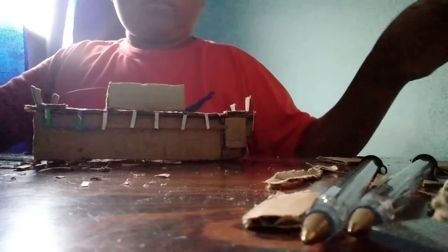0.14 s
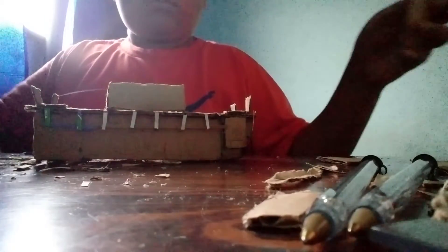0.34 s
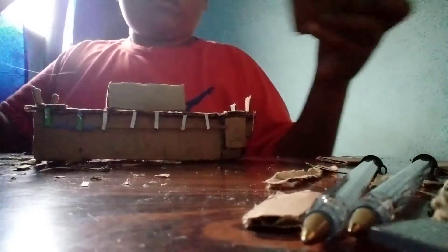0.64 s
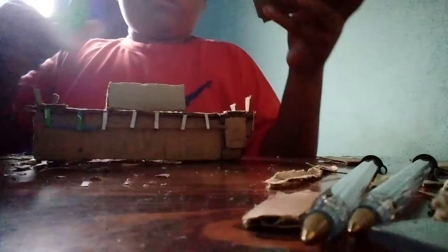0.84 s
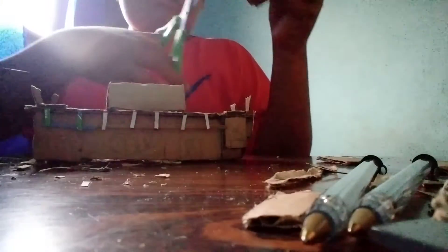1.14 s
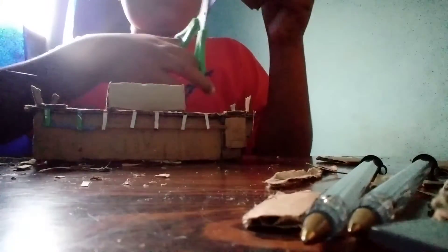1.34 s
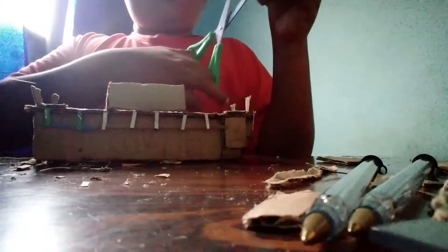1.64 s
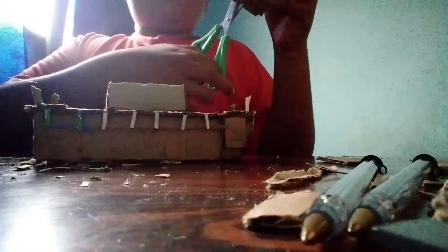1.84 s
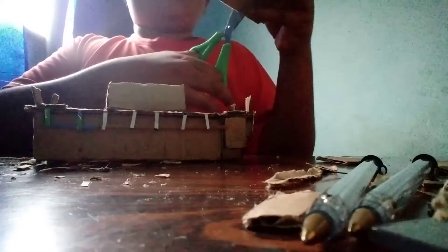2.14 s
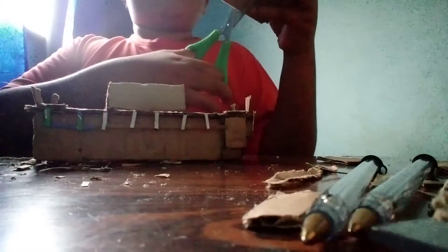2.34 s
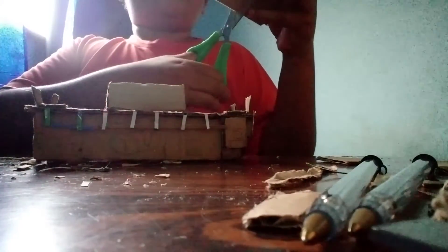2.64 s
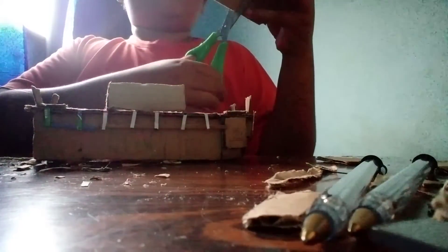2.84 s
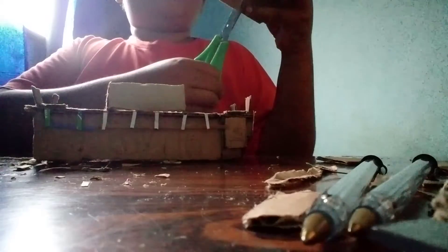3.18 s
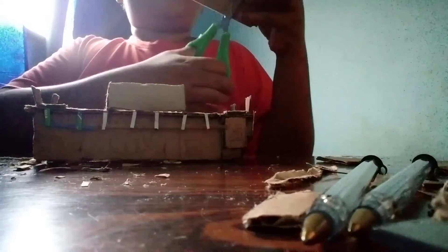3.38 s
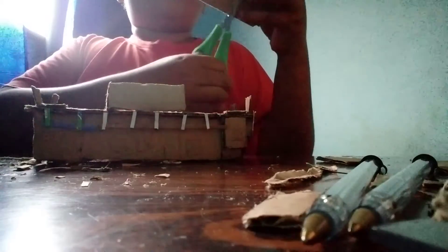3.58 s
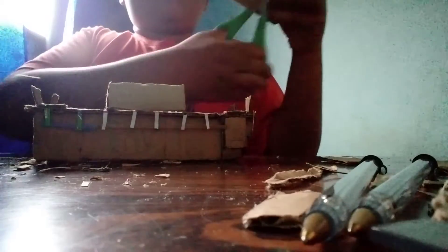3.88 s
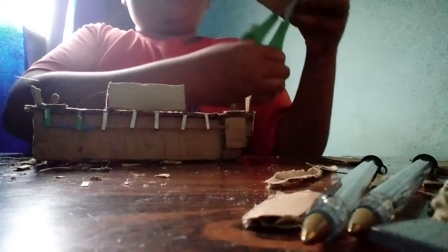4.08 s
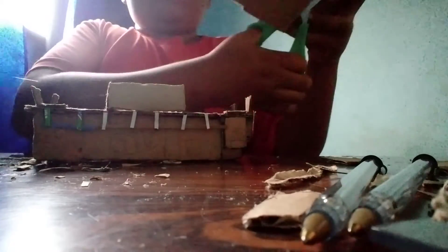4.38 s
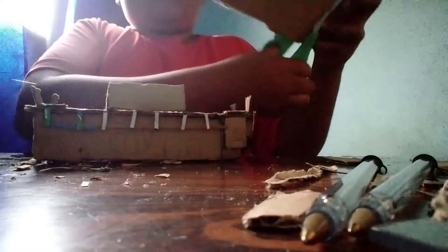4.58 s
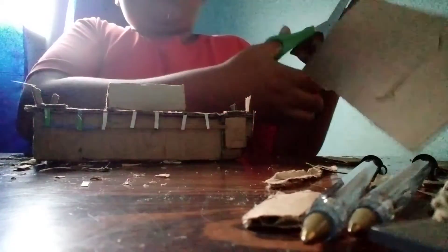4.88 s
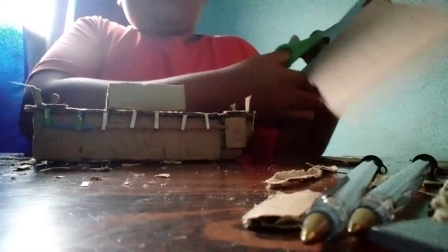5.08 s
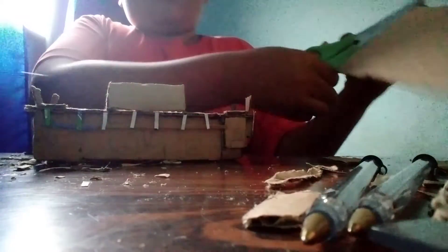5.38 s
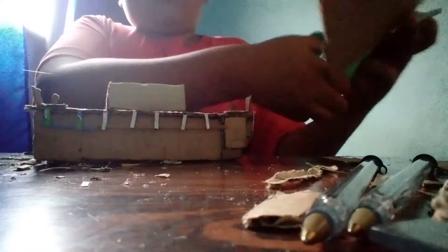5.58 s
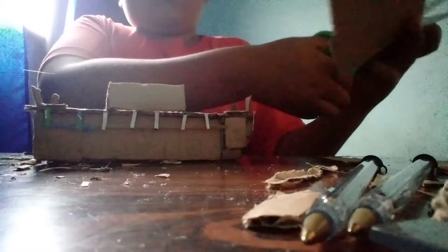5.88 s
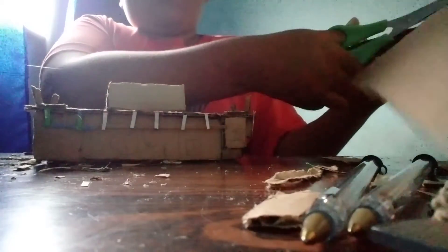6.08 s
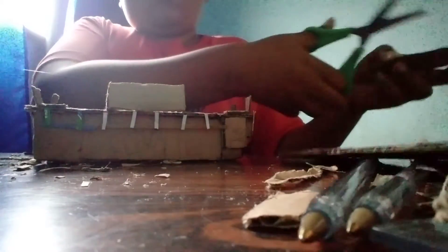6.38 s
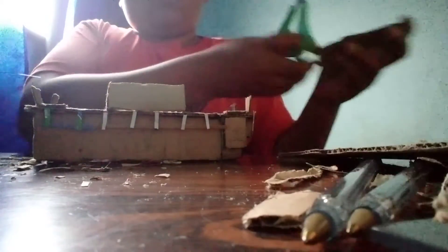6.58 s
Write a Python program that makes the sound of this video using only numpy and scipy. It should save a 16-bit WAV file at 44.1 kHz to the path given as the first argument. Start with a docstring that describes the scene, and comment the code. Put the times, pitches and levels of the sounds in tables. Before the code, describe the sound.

In a small quiet room, cardboard knocks lightly on a wooden table and rubs softly under fingers. Scissor blades scrape and rasp faintly, then bite through the card in four short crunches full of crisp snaps. After more soft handling, the offcut falls, slapping flat on the table and skittering briefly. One close microphone, with faint air and low hum.

```python
"""Scissors crunch through card in four cuts: bursts of breaking fibres and sharp snaps ring the sheet.
Blades scrape along the slit around the cuts and rasp lightly, steel on steel; hands rub over the card.
The sheet taps a wooden table as it is lifted; at the end the offcut drops flat, slaps and skitters.
Friction is random crackle, snaps and knocks are single pushes, all fed into resonances.
A small room adds a short tail, over still air and a faint mains hum, heard by one microphone."""
import sys
import numpy as np
from scipy import signal
from scipy.fft import rfft, irfft
from scipy.io import wavfile

SR = 44100
rng = np.random.default_rng(int(sys.argv[2]) if len(sys.argv) > 2 else 0)


def generate_wav(signal):
    """Clip the signal to [-1, 1] and save it as 16-bit WAV at the path in sys.argv[1]."""
    frames = np.transpose(np.atleast_2d(signal))
    scaled = np.clip(frames, -1, 1) * 32767
    pcm = np.round(scaled).astype(np.int16)
    wavfile.write(sys.argv[1], SR, pcm)


N = 296352
T = np.arange(N) / SR  # seconds
TAPS = 4096  # length of a resonance response, samples
FREQS = np.maximum(np.fft.rfftfreq(TAPS, 1 / SR), 1)  # Hz

# Event levels are relative: each layer is trimmed again in the mix.
# Mode widths are nominal: each card scales them by its damping.

# blades closing through the card: (full force from [s], length [s], crunch [dB],
# sheet body re crunch [dB], hiss re crunch [dB])
CUTS = [(3.013, 0.11, -48.5, 6, 2), (3.633, 0.093, -42.5, 3.5, 2.5), (4.138, 0.079, -37.5, -2, 2),
        (4.59, .13, -43, -2, 5)]
# sheet resonances, which change as the slit grows, one table a cut:
# (frequency [Hz], width [Hz], level [dB])
SHEET_CUT_1 = [(540, 49, 2), (648, 40, -36), (1600, 410, -17), (2540, 110, -9.5), (3160, 75, -13.5)]
SHEET_CUT_2 = [(465, 81, -6), (538, 100, -6), (843, 36, -9), (1272, 55, -2), (1660, 69, -5.5),
               (1970, 180, -6.5), (2580, 140, -3.5), (3190, 64, -10)]
SHEET_CUT_3 = [(440, 16, -1), (550, 240, 0), (900, 87, -6), (960, 88, -4), (1260, 46, 2), (1360, 150, -0.5),
               (1800, 200, -1.5), (2150, 160, -2.5), (2620, 130, -2)]
SHEET_CUT_4 = [(504, 124, 8), (1315, 63, 2), (1600, 220, -2.5), (2250, 160, 2.5), (2636, 47, 2),
               (3100, 120, -10)]
# slow bending of the whole sheet in the hand: (frequency [Hz], width [Hz], level [dB])
BENDING_MODES = [(110, 14, -10.5), (263, 41, -14.5)]
# fibre bundles snapping during the cuts: (time [s], peak [dB], sheet body [dB])
SNAPS = [(3.013,-31.5,19), (3.036,-46,2), (3.063,-24,16), (3.0926,-17.5,12.5), (3.098,-19.5,-9),
         (3.633,-39,8), (3.664,-19,5), (3.679,-28,1), (3.695,-23.5,12), (3.700,-25,1), (3.712,-16,10),
         (3.7167,-19,-1), (3.7264,-31,2), (4.168,-15.5,-0.5), (4.1828,-19,3), (4.2102,-43,7),
         (4.2213,-41,7), (4.602,-26,-10), (4.623,-22,0.5), (4.6727,-35,9), (4.685,-20,-4), (4.704,-14,-7)]
# blades and fingers catching on the card: (time [s], peak [dB], sheet body [dB], hiss [dB])
CATCHES = [(0.223,-35,-6,0), (1.3746,-37.5,10.5,4), (1.446,-36.5,26,2), (1.8238,-47,4,2), (3.174,-35,2,10),
           (3.2043,-34,0,19), (3.2404,-24.5,-5,18), (3.6237,-30,-2,25), (3.8607,-35,2,-8),
           (4.1112,-32,5,18), (4.575,-39,0,6), (4.8583,-24,-24,-4), (5.1,-30,-3,24), (5.167,-38,-1,-8),
           (5.188,-43,16,-9), (5.2258,-26.5,13,5.5), (5.5267,-36.5,18,13.5), (5.6385,-31,7,2)]
# blades sliding along the slit: (onset complete [s], length [s], final scrape [dB],
# sheet body re scrape [dB], hiss re scrape [dB])
SCRAPES = [(1.375, 0.0094, -60.5, 1, 3), (1.433, 0.024, -62.5, 9, 3.5), (1.528, 0.026, -55.5, -2, -1),
           (1.827, 0.048, -66.5, 7, 4.5), (1.908, 0.026, -53, -9.5, 0.5), (1.988, 0.17, -63.5, -8, 0.5),
           (2.158, 0.039, -61.5, 4.5, -1), (2.415, .05, -68, 6, 1.5), (3.158, 0.1, -64, 3, 10.5),
           (3.405, .045, -52, 2, 8), (3.57, 0.019, -74.5, 9, 14), (3.9, 0.031, -45.5, 1.5, 5),
           (4.39, 0.028, -42.5, 1.5, 3.5), (4.762, 0.042, -48.5, 1, 0.5), (4.874, 0.043, -46, 1.5, 6.5),
           (4.981, 0.033, -64, -4, 1.5), (5.637, 0.025, -54.5, 4.5, 5.5)]
# the sheet pinched by the blades: (frequency [Hz], width [Hz], level [dB])
PINCHED_SHEET = [(527, 153, -2.5), (860, 120, -43), (1235, 93, -4.5), (1570, 150, -3.5), (2070, 380, -1.5),
                 (2625, 490, -3)]
# steel rasping lightly on steel: (loudest at [s], rise [s], fall [s], level [dB])
RASPS = [(.89, 0.0088, 0.023, -64.5), (1.215, 0.014, 0.019, -62), (2.085, 0.0062, 0.032, -63.5),
         (2.19, 0.027, .015, -65), (2.8, 0.026, 0.017, -81)]
# ring of the blades: (frequency [Hz], width [Hz], level [dB])
BLADE_MODES = [(2880, 470, -7), (4760, 140, 5), (5300, 300, 1)]
# hands sliding over the card: (fastest at [s], rise [s], fall [s], rub [dB],
# sheet body re rub [dB], hiss re rub [dB])
RUBS = [(.015, 0.014, .09, -53.5, -0.5, -4.5), (.15, 0.011, 0.025, -56, 10, 10.5),
        (.232, 0.022, 0.022, -50.5, 3, 5.5), (.285, 0.019, 0.066, -54.5, 2, 5),
        (.395, 0.033, .012, -42.5, -10, -0.5), (.46, 0.013, 0.058, -55.5, -1, 5.5),
        (.57, .015, 0.068, -72, 23.5, -3), (.64, .025, 0.098, -61.5, 11.5, 7),
        (0.886, 0.0072, 0.043, -59.5, -15, 6), (.995, 0.0083, 0.038, -58.5, -5, 7.5),
        (1.08, 0.049, 0.086, -58, 7.5, 5.5), (1.19, 0.067, 0.081, -63, 15, 8.5),
        (5.107, 0.0048, 0.047, -58.5, 4, 19.5), (5.19, 0.026, .05, -44.5, 5.5, 1.5),
        (5.315, 0.0064, 0.027, -52.5, 4.5, 8.5), (5.391, .03, 0.036, -55.5, -1.5, 8.5),
        (5.535, .008, 0.089, -63, 10, 9.5), (5.92, 0.017, 0.024, -64.5, 6, 13),
        (6.033, 0.023, 0.062, -53, 3, 10.5), (6.199, 0.021, 0.099, -64, 1, 15),
        (6.315, 0.02, 0.012, -46.5, -3, -4), (6.63, .01, 0.026, -51, -11, 9.5),
        (6.71, .06, .04, -61, -3, 4)]
# the sheet held loosely: (frequency [Hz], width [Hz], level [dB])
LOOSE_SHEET = [(463, 130, 2.5), (662, 87, 4), (1210, 98, -10), (1610, 390, -11), (2405, 600, -5)]
# card knocking on the table: (time [s], peak [dB], thud [dB], crack [dB], tick [dB]);
# the last three shape the tone around the clap of the card
KNOCKS = [(0.0689,-23.5,3.5,0.5,-9.5), (.0966,-29,2,4,-1), (0.1076,-29,-2,-4.5,-1.5),
          (0.3326,-20.5,-3.5,-1,-12), (0.3523,-28,-4,-6,-16), (0.4058,-35,5,-5,-1), (6.2123,-29,14,0.5,0.5),
          (6.233,-33,31,-10,-24), (6.301,-39,-9,-9,-9), (6.3314,-42.5,10,11,-10), (6.3918,-30,14,6,-7),
          (6.4096,-15.5,2,-9,-2.5), (6.42,-16,-10,-5,-16), (6.4317,-15.5,1,3.5,0), (6.452,-25,0,-8,-11),
          (6.467,-24.5,-2,-4,-16), (6.473,-29,-8,-5,-21), (6.5093,-38,-9,-11,-11), (6.57,-40.5,-10,-15,-20)]
# the uncut sheet against the table top: (frequency [Hz], width [Hz], level [dB])
UNCUT_MODES = [(294.5, 32, -1), (342, 6.2, -4), (604, 16, 2.5), (725, 52, 0), (867, 45, 6),
               (1120, 57, -3.5), (1560, 49, -7.5), (1745, 170, -6), (2470, 220, -10), (2580, 87, -8),
               (2900, 130, -6.5), (5670, 590, -18)]
# the offcut against the table top: (frequency [Hz], width [Hz], level [dB])
OFFCUT_MODES = [(67.4, 24, 0.5), (126, 37, -2), (283, 29, 7.5), (366, 40, 3), (467, 81, -7), (588, 15, 4.5),
                (751, 26, 9), (794, 18, 5), (905, 20, 11.5), (1070, 36, -12), (1095, 58, -1),
                (1510, 380, -5), (1820, 80, 1), (2230, 320, -1.5), (2590, 110, -1.5), (3220, 200, -18),
                (4640, 630, -37.5), (5360, 1200, -14.5)]
# colour of the fibre hiss, read from 3600 Hz up: (frequency [Hz], level [dB])
HISS_COLOUR = [(1760, -33), (3000, -3), (3220, -3), (3500, -36), (3860, -13.5), (4930, 0), (5520, -3),
               (6170, -7.5), (7670, -7), (9600, 0), (12200, -1.5), (14900, 0), (16000, -16)]
# borders of the body, crunch and hiss registers: (frequency [Hz])
SHEET_EDGES = [90, 1000, 4000, 20000]
# borders of the thud, clap, crack and tick registers: (frequency [Hz])
KNOCK_EDGES = [50, 480, 1300, 4000, 20000]
# colour of the still room, relative: (frequency [Hz], density [dB per Hz])
AIR_COLOUR = [(25, -6), (50, -4), (75, -8.5), (125, -14), (200, -23), (400, -26.5), (700, -33.5),
              (1200, -40.5), (3800, -48), (5000, -43.5), (6800, -52), (12000, -41.5), (16000, -44.5)]
# mains hum before it wavers: (frequency [Hz], rms level [dB])
HUM = [(59.2, -59), (122, -74.5)]

# cuts bite, push on steadily, surge as the card gives way and die out
BITE_S, CUT_RELEASE_S = 0.012, 0.028
SURGE_DB, SURGE_S = 5.5, 0.017
# scrapes start quickly, grow as the blades gather speed and die out
SCRAPE_ATTACK_S, SCRAPE_SWELL_DB, SCRAPE_RELEASE_S = 0.007, 6, 0.027
# the offcut skitters as it lands
SKITTER_S, SKITTER_DB = 6.412, -39.5
SKITTER_ATTACK_S, SKITTER_HOLD_S, SKITTER_RELEASE_S = 0.012, 0.047, 0.022
HISS_POWER = 0.97  # hiss follows the effort raised to this power
AIR_DB = -59  # rms of the still air
TOP_HZ = 15900  # upper limit of the recorder


def nearest_cut(s):
    """Index of the cut whose middle lies closest to time s."""
    return np.argmin([abs(start + length / 2 - s) for start, length, *_ in CUTS])


def scissors():
    """Breaking fibres, sliding blades, snaps and catches all drive the resonances of the sheet."""
    shapes = (SHEET_CUT_1, SHEET_CUT_2, SHEET_CUT_3, SHEET_CUT_4)
    sheets = [card(modes + BENDING_MODES, SHEET_EDGES, damping=1, hiss_db=-12) for modes in shapes]
    pinched = card(PINCHED_SHEET, SHEET_EDGES, damping=0.94, hiss_db=-4.5)
    cuts, scrapes, snaps, catches = np.zeros((4, N))

    for (start, length, db, body, hiss), sheet in zip(CUTS, sheets):
        # the surge peaks just before the end of the cut
        from_surge = T - start - length + SURGE_S / 2
        surge = undb(SURGE_DB * np.exp(-(from_surge / SURGE_S) ** 2))
        effort = envelope(start, BITE_S, length, CUT_RELEASE_S) * surge
        cuts += stroke(effort, sheet, (db + body, db, db + hiss), per_s=1400, spread_db=1.0,
                       smooth=0.49, slip_hz=149.8, slip_db=4.5)

    for start, length, db, body, hiss in SCRAPES:
        effort = envelope(start, SCRAPE_ATTACK_S, length, SCRAPE_RELEASE_S, SCRAPE_SWELL_DB)
        scrapes += stroke(effort, pinched, (db + body, db, db + hiss), per_s=4500, spread_db=3.5,
                          smooth=0.99, slip_hz=188, slip_db=2.5)

    for s, db, body in SNAPS:
        cut = nearest_cut(s)
        hiss = CUTS[cut][-1]
        snap = blow(sheets[cut], (body, 0.5, hiss), crumble_s=0.0048, crumble_db=7)
        add(snaps, s, undb(db) * snap)

    for s, db, body, hiss in CATCHES:
        sheet = sheets[nearest_cut(s)]
        catch = blow(sheet, (body, -1, hiss), crumble_s=0.0045, crumble_db=1.5)
        add(catches, s, undb(db) * catch)

    return undb(-6.0) * cuts + undb(-3.5) * scrapes + undb(-4.5) * snaps + undb(-4.5) * catches


def rasp():
    """Light friction rings the thin steel blades."""
    edges = (SHEET_EDGES[1], SHEET_EDGES[-1])
    blades, = card(BLADE_MODES, edges, damping=0.4, hiss_db=-16)
    effort = sum(undb(db) * envelope(s, rise, 0, fall) for s, rise, fall, db in RASPS)
    force = crackle(N, per_s=4500, spread_db=4, smooth=0.49) * effort
    return undb(2.5) * signal.fftconvolve(force, blades)[:N]


def handling():
    """Fingers rub softly over the loose sheet, each rub swelling and fading."""
    sheet = card(LOOSE_SHEET, SHEET_EDGES, damping=1.21, hiss_db=-7.5)
    rubs = np.zeros(N)
    for s, rise, fall, db, body, hiss in RUBS:
        effort = envelope(s, rise, 0, fall)
        rubs += stroke(effort, sheet, (db + body, db, db + hiss), per_s=3300, spread_db=-1.5,
                       smooth=1.0, slip_hz=93.3, slip_db=4.5)
    return undb(-8.0) * rubs


def table():
    """Knocks ring card and table top: taps of the lifted sheet, then the offcut slapping and skittering."""
    uncut = card(UNCUT_MODES, KNOCK_EDGES, damping=0.78, hiss_db=-21.5)
    offcut = card(OFFCUT_MODES, KNOCK_EDGES, damping=1.32, hiss_db=-43)
    knocks = np.zeros(N)
    for s, db, thud, crack, tick in KNOCKS:
        piece = uncut if s < CUTS[0][0] else offcut
        knock = blow(piece, (thud + 0.5, 1.5, crack, tick), crumble_s=0.0037, crumble_db=3.0)
        add(knocks, s, undb(db) * knock)

    sliding = card(OFFCUT_MODES, SHEET_EDGES, damping=2.4, hiss_db=-5)
    effort = envelope(SKITTER_S, SKITTER_ATTACK_S, SKITTER_HOLD_S, SKITTER_RELEASE_S)
    skitter = stroke(effort, sliding, levels_db=(0.5, -2.5, -8), per_s=900, spread_db=0,
                     smooth=0.2, slip_hz=146.7, slip_db=9)
    return knocks + undb(SKITTER_DB) * skitter


def stroke(effort, registers, levels_db, per_s, spread_db, smooth, slip_hz, slip_db):
    """One stroke of friction: crackle that sticks and slips, scaled by effort and fed into the card."""
    first, last = np.flatnonzero(effort > 0.01)[[0, -1]]
    t, effort = T[first:last], effort[first:last]
    # irregular slips, slip_hz a second on average
    slips = t[0] + np.cumsum(rng.uniform(0.5, 1.5, 600)) / slip_hz
    grip = undb(slip_db * np.interp(t, slips, rng.uniform(-0.84, 1, len(slips))))
    grip = grip / np.sqrt(np.mean(grip ** 2))
    force = crackle(2 * SR, per_s, spread_db, smooth)[:len(t)] * grip
    out = np.zeros(N)
    for response, db, power in zip(registers, levels_db, (1, 1, HISS_POWER)):
        push = force * undb(db) * effort ** power
        add(out, t[0], signal.fftconvolve(push, response))
    return out


def blow(registers, levels_db, crumble_s, crumble_db):
    """One sharp push followed by a short crumble of fibres; peak 1."""
    t = np.arange(TAPS) / SR
    crumble = crackle(TAPS, 6000, 4.4, 0.61) * np.exp(-t / crumble_s)
    force = undb(crumble_db) * crumble / np.linalg.norm(crumble)
    force[0] += 1
    ring = sum(undb(db) * response for response, db in zip(registers, levels_db))
    sound = signal.fftconvolve(force, ring)
    return sound / np.abs(sound).max()


def crackle(size, per_s, spread_db, smooth):
    """Fibres letting go at random with scattered strengths, over smooth friction noise; rms 1."""
    strength = undb(spread_db * np.minimum(rng.exponential(size=size), 4))
    happens = rng.random(size) < per_s / SR
    clicks = happens * rng.choice([-1, 1], size) * strength
    friction = clicks / (clicks.std() + 1e-9) + smooth * rng.standard_normal(size)
    return friction / friction.std()


def card(modes, edges, damping, hiss_db):
    """Impulse responses, one a register: resonant peaks plus a bed of high hiss."""
    power = 0
    for hz, width, db in modes:
        detuning = (FREQS ** 2 - hz ** 2) / (FREQS * width * damping)
        power = power + undb(db) ** 2 / (1 + detuning ** 2)
    hiss = undb(hiss_db) * colour(HISS_COLOUR, np.maximum(FREQS, 3600)) * FREQS / (FREQS + 500)
    gain = np.sqrt(power + hiss ** 2)
    registers = []
    for lo, hi in zip(edges, edges[1:]):
        band = np.sqrt((1 + (lo / FREQS) ** 10) * (1 + (FREQS / hi) ** 10))
        registers.append(causal(gain / band))
    return registers


def causal(gain):
    """Unit-energy impulse response with this gain, its energy as early as possible (minimum phase)."""
    cepstrum = irfft(np.log(gain / gain.max() + 1e-6))
    cepstrum[1:TAPS // 2] *= 2
    cepstrum[TAPS // 2 + 1:] = 0
    response = irfft(np.exp(rfft(cepstrum)))
    return response / np.linalg.norm(response)


def envelope(start, attack_s, hold_s, release_s, swell_db=0):
    """Gain that rises until the start, swells to 1 during the hold and then dies away exponentially."""
    t = T - start
    outside = np.maximum(-t, 0) / attack_s + np.maximum(t - hold_s, 0) / release_s
    still_to_swell = np.clip(1 - t / max(hold_s, 1e-3), 0, 1)
    return np.exp(-np.minimum(outside, 50)) * undb(-swell_db * still_to_swell)


def add(track, s, sound):
    """Mix a sound into the track at time s."""
    start = max(int(s * SR), 0)
    track[start:start + len(sound)] += sound[:max(N - start, 0)]


def undb(db):
    """Decibels to gain."""
    return 10 ** (np.asarray(db) / 20)


def colour(points, freqs):
    """Gain at the given frequencies, drawn between spectrum points on a log-frequency axis."""
    hz, db = np.transpose(points)
    return undb(np.interp(np.log(freqs), np.log(hz), db))


def room(sound, low_t60, high_t60):
    """Bare walls close by: a short dense noise tail whose lows and highs die away at their own rates."""
    t = T[:SR // 2]
    noise = rng.standard_normal(len(t))
    low = signal.sosfilt(signal.butter(2, [140, 2500], "band", fs=SR, output="sos"), noise)
    high = signal.sosfilt(signal.butter(2, 2500, "high", fs=SR, output="sos"), noise)
    tail = low * 1000 ** (-t / low_t60) - high * 1000 ** (-t / high_t60)
    tail = tail * np.clip((t - 0.002) / 0.0042, 0, 1)  # fades in after 2 ms
    return signal.fftconvolve(sound, tail / np.linalg.norm(tail))[:N]


def background():
    """Still air as coloured noise, and a mains hum that wavers a little in level and phase."""
    freqs = np.maximum(np.fft.rfftfreq(N, 1 / SR), 1)
    air = irfft(rfft(rng.standard_normal(N)) * colour(AIR_COLOUR, freqs), N)
    knots = np.linspace(0, T[-1], num=20)
    waver = np.interp(T, knots, rng.standard_normal(len(knots)))
    hum = np.zeros(N)
    for hz, db in HUM:
        hum += np.sqrt(2) * undb(db) * np.sin(2 * np.pi * hz * T + 0.35 * waver)
    return undb(AIR_DB) * air / air.std() + hum * undb(waver)


def scene():
    """One microphone on both channels; the table top feeds the room more than the hands do."""
    hands = scissors() + rasp() + handling()
    knocks = table()
    walls = room(undb(-9.5) * hands + undb(-7.5) * knocks, low_t60=0.24, high_t60=0.17)
    mono = hands + knocks + walls + background()
    return np.array([mono, mono])


def record(dry):
    """The recorder drops the deepest bass and cuts the top."""
    thin = signal.sosfilt(signal.butter(6, 46, "high", fs=SR, output="sos"), dry)
    return signal.sosfilt(signal.ellip(10, 0.2, 70, TOP_HZ, fs=SR, output="sos"), thin)


dry = scene()
out = record(dry)
generate_wav(out)
```